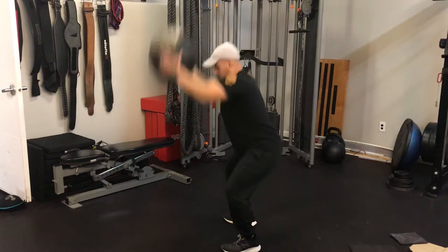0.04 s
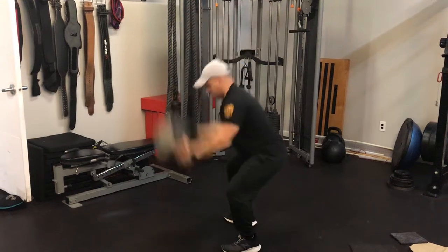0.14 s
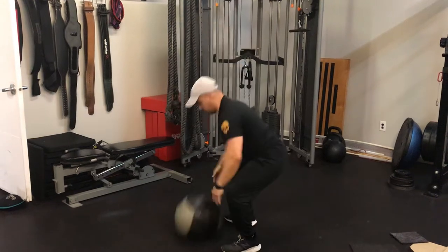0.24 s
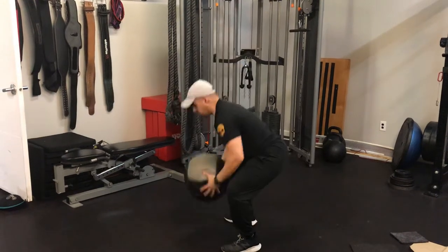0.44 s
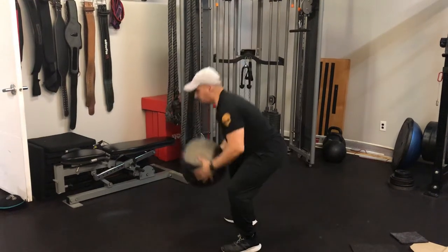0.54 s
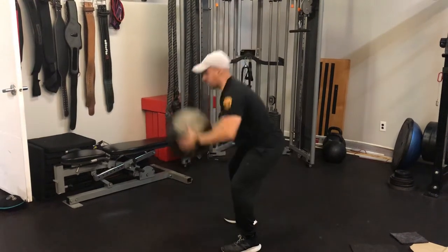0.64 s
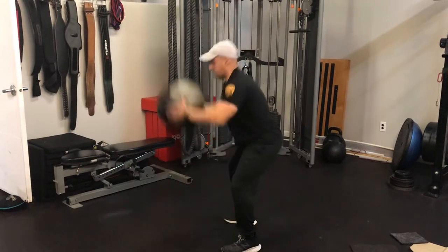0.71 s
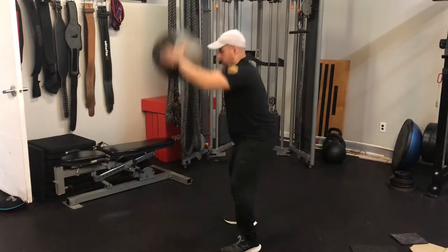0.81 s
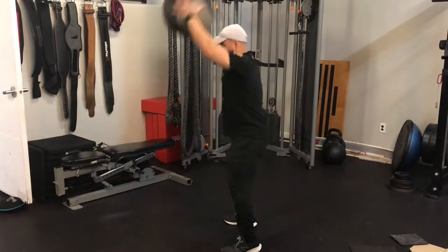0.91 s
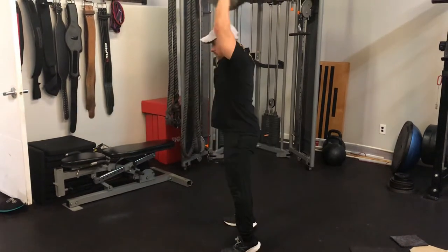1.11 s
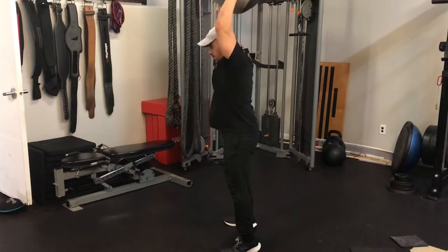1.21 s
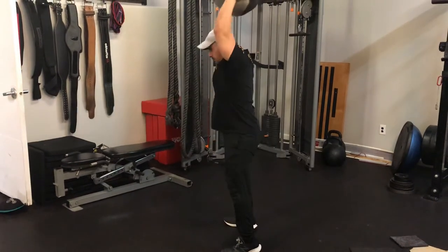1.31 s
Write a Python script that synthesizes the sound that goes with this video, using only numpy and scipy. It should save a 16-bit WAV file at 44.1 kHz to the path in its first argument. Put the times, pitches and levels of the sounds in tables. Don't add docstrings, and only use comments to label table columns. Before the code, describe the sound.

A heavy soft ball hits a rubber gym floor. Faint clothing rustle and a quick swelling rush of air lead to one loud slap at about 0.25 s, gritty and bright, with low thumps until roughly 0.35 s. Dense hall echoes and wavering low resonances decay for about a second. A very faint palm tick and scrape comes near 0.45 s, then soft cloth rustle around 0.9 s over quiet room noise.

```python
import sys
import numpy as np
from scipy import signal
from scipy.fft import rfft, irfft
from scipy.io import wavfile
from scipy.ndimage import uniform_filter1d

SR = 44100
rng = np.random.default_rng(int(sys.argv[2]) if len(sys.argv) > 2 else 0)


def generate_wav(signal):
    frames = np.transpose(np.atleast_2d(signal))
    scaled = np.clip(frames, -1, 1) * 32767
    pcm = np.round(scaled).astype(np.int16)
    wavfile.write(sys.argv[1], SR, pcm)


def volts_from_decibels(level):
    exponent = np.asarray(level, float) / 20
    return 10 ** exponent


N = 59535
HIT_S = 0.2475

# (time [s], level [dB], ring [Hz], t60 [s])
SLAPS = [(0.2472, -3.5, 4915, 0.004), (.2479, -6, 3070, 0.0034), (0.2481, -3.5, 4600, 0.0032),
         (0.252, -4, 1790, 0.011), (0.2506, -11, 596, 0.0068), (0.2529, -4, 2210, 0.0056),
         (0.2532, -14.5, 1320, .008), (0.2563, 2.5, 4900, 0.0018), (0.2565, -22, 3550, 0.0035),
         (0.2583, -15.5, 2200, 0.005), (0.2597, -9, 1690, .006)]
# (frequency [Hz], density [dB per Hz])
CRACK_COLOUR = [(240, -34), (400, -6), (1760, -4), (3790, -8.5), (4560, -4), (9950, -14), (15500, -35)]
# (centre [s], level [dB],
# frequency [Hz], length [s])
THUMPS = [(0.2517, -9, 292, 0.0015), (.2652, -6, 105, 0.0033), (.2685, -9, 226, .005),
          (.277, -13, 80.3, 0.0086), (.2897, -6.5, 112.5, .0055), (.302, -13.5, 105, 0.0033),
          (0.2938, -18, 285, 0.012), (.3235, -14, 247.6, 0.0074), (.345, -21, 325, 0.011),
          (.36, -32.5, 176, 0.02), (0.348, -22.5, 50.7, 0.013), (.487, -32.5, 80, 0.027)]
# (frequency [Hz], density [dB per Hz])
TAIL_COLOUR = [(25, -17.5), (60, -14), (200, -8), (420, -17), (1000, -16), (5000, -20.5), (9000, -26),
               (15500, -45.5)]
# (frequency [Hz], width [octaves], level [dB])
HALL_BUMPS = [(580, 0.065, 4.5), (1832, 0.16, 3.5), (4760, 0.22, 1.5), (8660, 0.036, 2.5)]
# (frequency [Hz], t60 [s])
HALL_T60 = [(60, 0.85), (250, 1.42), (700, 1.325), (1900, 1.273), (3800, 1.021), (8500, 0.72), (11000, .45),
            (15000, 0.52)]
# (frequency [Hz], rise [s])
HALL_RISE = [(60, .03), (500, 0.0051), (3000, .004), (16000, .003)]
# (frequency [Hz], level [dB])
NEAR_WALLS = [(60, 4), (300, 7.84), (1000, 0.95), (5000, 1), (16000, 4)]
# (frequency [Hz], level [dB], t60 [s])
MODES = [(57, -41, 2.8), (71.4, -40, 3.3), (79.7, -29, 1.3), (99.8, -36, 2.2), (125, -30.5, .6),
         (183.6, -36, 1.8), (217.8, -34.5, 2.8), (251.8, -33, 1.4), (285, -23, 0.73), (325, -32.5, 1.1),
         (331.8, -35.5, 2.3), (391.5, -35.5, 0.88), (488, -45, 2.3), (573, -29.5, .7)]
# (frequency [Hz], density [dB per Hz])
RUSH_COLOUR = [(60, -15), (250, -4.5), (700, 0), (1300, -3), (2700, -12.5), (5300, -8), (9000, -18.5),
               (15500, -35)]
# (frequency [Hz], density [dB per Hz])
WAKE_COLOUR = [(60, -13), (150, 2), (240, 6.5), (400, -6), (600, -3.5), (1500, -49)]
# (time [s], level [dB], t60 [s], lowest frequency [Hz])
CATCHES = [
    (.4435, -45, .015, 9500),
    (.447, -51, .3, 11000),
]
# (frequency [Hz], density [dB per Hz])
CLOTH_COLOUR = [(300, -57), (500, -4.5), (800, -5.5), (2000, -8.5), (3000, -12), (7000, -12),
                (10500, -15.5), (15500, -28.5)]
# (centre [s], level [dB], length [s])
SWINGS = [
    (0.101, -59.5, 0.043),
    (0.201, -51, 0.025),
    (0.889, -58.5, 0.13),
    (1.28, -69, .05),
]
# (frequency [Hz], density [dB per Hz])
ROOM_COLOUR = [(25, -17.5), (50, -5.5), (120, 8.5), (350, 0), (700, -11.5), (2000, -16.5), (8000, -22.5),
               (15500, -37)]


def evened(x):
    return x / np.sqrt(np.mean(x ** 2) + 1e-20)


def read(points, hz):
    f, value = np.transpose(points)
    return np.interp(np.log(hz + 1), np.log(f + 1), value)


def coloured(points):
    hz = np.fft.rfftfreq(N + 1, 1 / SR)
    spectrum = rfft(rng.standard_normal(N + 1)) * volts_from_decibels(read(points, hz))
    return evened(irfft(spectrum)[:N])


def since(s):
    t = np.arange(N) / SR - s
    return np.maximum(t, 0), t >= 0


def swell(s, length):
    t = np.arange(N) / SR
    return np.exp(-0.5 * ((t - s) / length) ** 2)


def slaps():
    rise_s = 0.00012
    crack_db, crack_t60, grit_db = -15.5, 0.058, 5
    rings = np.zeros(N)
    for s, db, hz, t60 in SLAPS:
        t, on = since(s)
        envelope = volts_from_decibels(db - 60 * t / t60) * np.minimum(t / rise_s, 1)
        rings += envelope * np.sin(2 * np.pi * hz * t)
    t, on = since(SLAPS[0][0])
    flutter = evened(uniform_filter1d(rng.standard_normal(N), size=20))
    crack = on * volts_from_decibels(crack_db - 60 * t / crack_t60) * volts_from_decibels(grit_db * flutter) * coloured(CRACK_COLOUR)
    return rings + crack


def thumps():
    t = np.arange(N) / SR
    out = np.zeros(N)
    for s, db, hz, length in THUMPS:
        out -= volts_from_decibels(db) * swell(s, length) * np.cos(2 * np.pi * hz * (t - s))
    return out


def hall():
    tail_db, early_t60 = -17.5, 0.33
    patch_db, patch_s = 0.7, 0.02
    t, on = since(HIT_S)
    hz = np.fft.rfftfreq(N, 1 / SR)
    bumps_db = np.zeros(len(hz))
    for f, octaves, db in HALL_BUMPS:
        bumps_db += db * np.exp(-0.5 * (np.log2((hz + 1) / f) / octaves) ** 2)
    spectrum = rfft(coloured(TAIL_COLOUR)) * volts_from_decibels(bumps_db)
    out = np.zeros(N)
    for centre in 40 * 2 ** (np.arange(54) / 6):
        distance = np.clip(6 * np.log2((hz + 1e-3) / centre), -1, 1)
        band = irfft(spectrum * np.cos(np.pi / 2 * distance) ** 2, N)
        patch = np.interp(t, np.arange(60) * patch_s, rng.standard_normal(60))
        late = volts_from_decibels(-60 * t / read(HALL_T60, centre) + patch_db * patch)
        early = volts_from_decibels(read(NEAR_WALLS, centre) - 60 * t / early_t60)
        rise = 1 - np.exp(-t / read(HALL_RISE, centre))
        out += band * rise * np.hypot(late, early)
    return volts_from_decibels(tail_db) * on * out


def modes():
    rise_s = 0.03
    waver_depth, waver_s, waver_hz = 0.7, 0.035, 70
    t, on = since(HIT_S)
    out = np.zeros(N)
    for hz, db, t60 in MODES:
        phase = rng.random()
        a, b = rng.standard_normal((2, 100))
        drift = np.interp(t / waver_s, np.arange(100), a + 1j * b)
        waver = 1 + waver_depth * np.sqrt(waver_hz / hz) * drift
        tone = (waver * np.exp(2j * np.pi * (hz * t + phase))).real
        out += volts_from_decibels(db - 60 * t / t60) * tone
    return out * (1 - np.exp(-t / rise_s))


def rush():
    rush_db, slope_db_per_s = -39.5, 245
    wake_db, wake_lead_s, wake_length_s = -35.5, 0.017, 0.019
    t = np.arange(N) / SR - HIT_S
    air = coloured(RUSH_COLOUR) * volts_from_decibels(rush_db - slope_db_per_s * abs(t))
    wake = coloured(WAKE_COLOUR) * volts_from_decibels(wake_db) * swell(HIT_S - wake_lead_s, wake_length_s)
    return air + wake


def catch():
    out = np.zeros(N)
    for s, db, t60, low_hz in CATCHES:
        t, on = since(s)
        skin = coloured([(low_hz * 0.7, -20), (low_hz, 0), (16000, -8)])
        rise = np.minimum(t / (0.046 * t60), 1)
        out += rise * volts_from_decibels(db - 60 * t / t60) * skin
    return out


def cloth():
    return coloured(CLOTH_COLOUR) * sum(volts_from_decibels(db) * swell(s, length) for s, db, length in SWINGS)


def room():
    return volts_from_decibels(-59.5) * coloured(ROOM_COLOUR)


def scene():
    ball = slaps() + thumps()
    answer = hall() + modes()
    return (ball + answer + rush() + catch() + cloth() + room())[None]


def top_cut(x):
    return signal.sosfilt(signal.butter(12, 16500, fs=SR, output="sos"), x)


def record(dry):
    low_hz, ceiling, edge_hz = 36, 1.6, 15760
    x = signal.lfilter(*signal.butter(2, low_hz, "high", fs=SR), dry)
    x = ceiling * np.tanh(x / ceiling)
    edge = signal.firwin(511, edge_hz, window=("kaiser", 9), fs=SR)
    mix = signal.oaconvolve(x, edge[None], "same")
    return top_cut(mix)


dry = scene()
out = record(dry)
generate_wav(out)
```